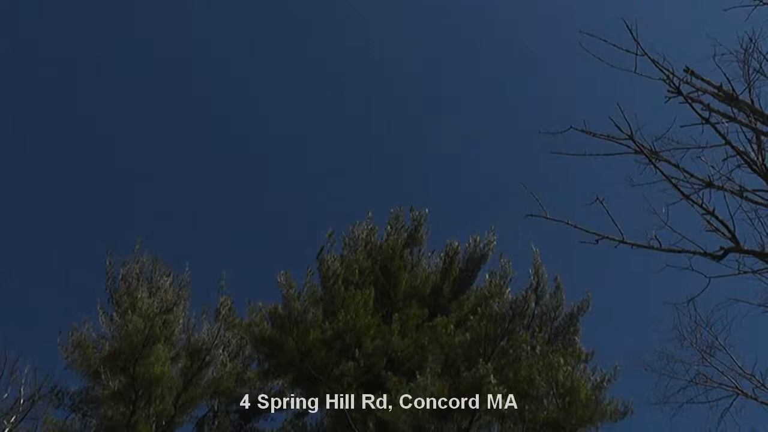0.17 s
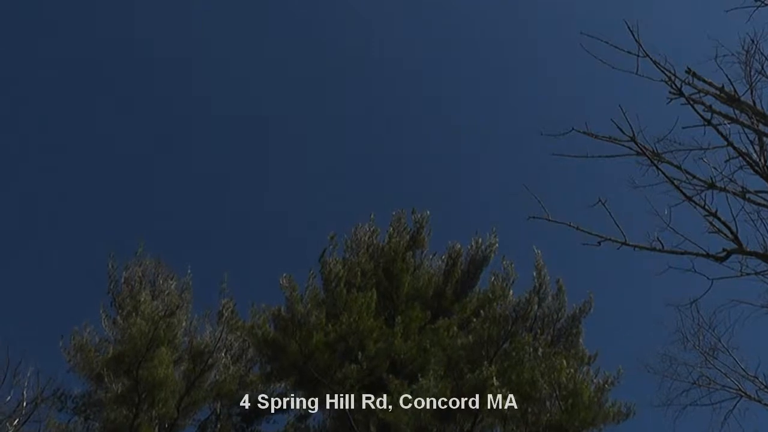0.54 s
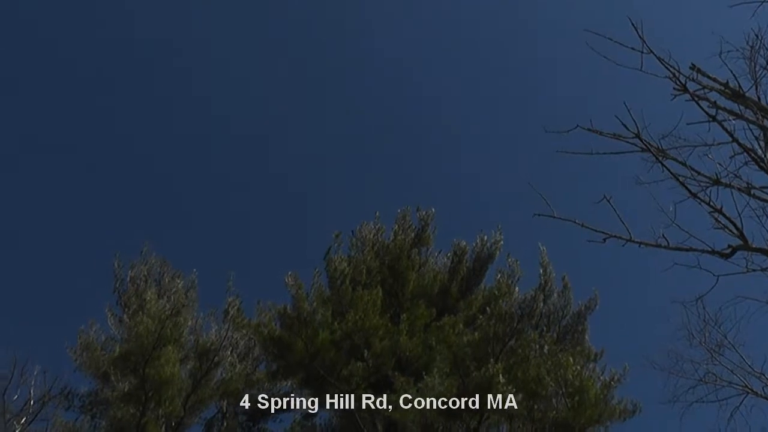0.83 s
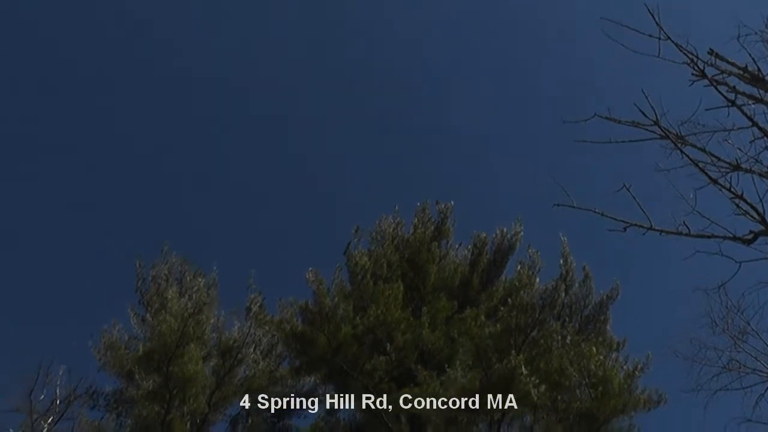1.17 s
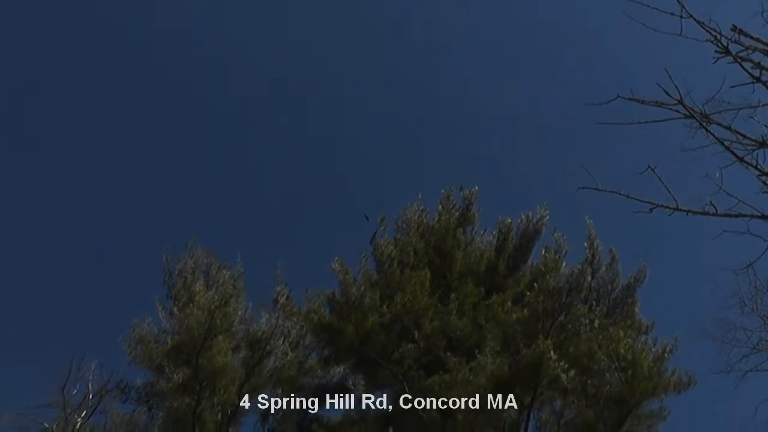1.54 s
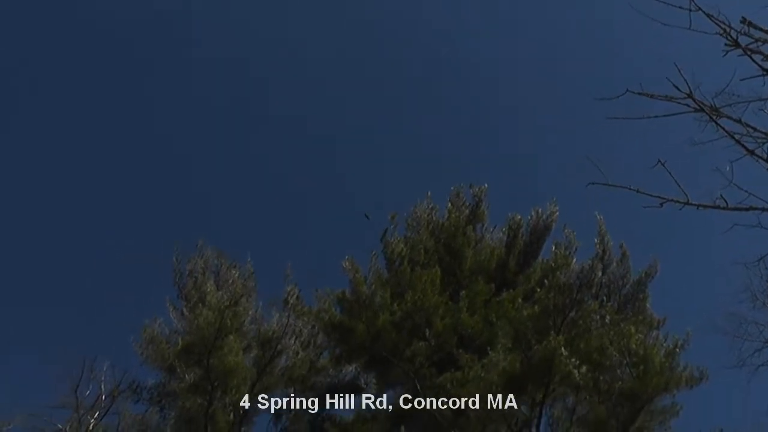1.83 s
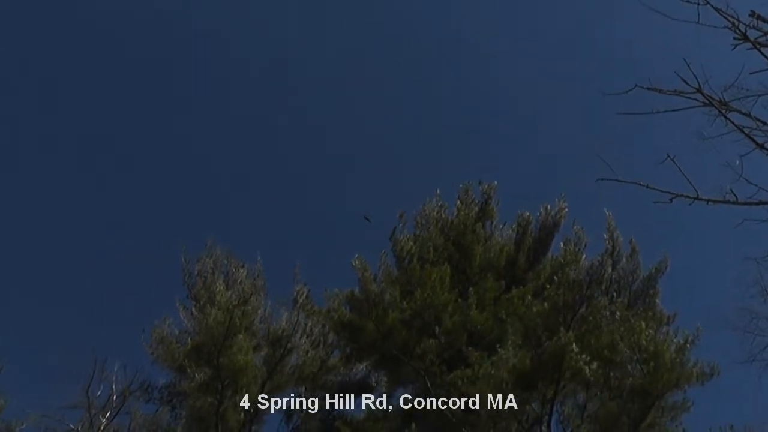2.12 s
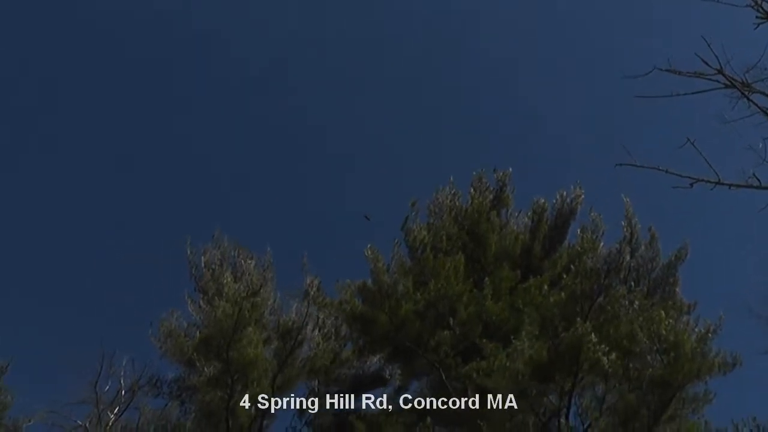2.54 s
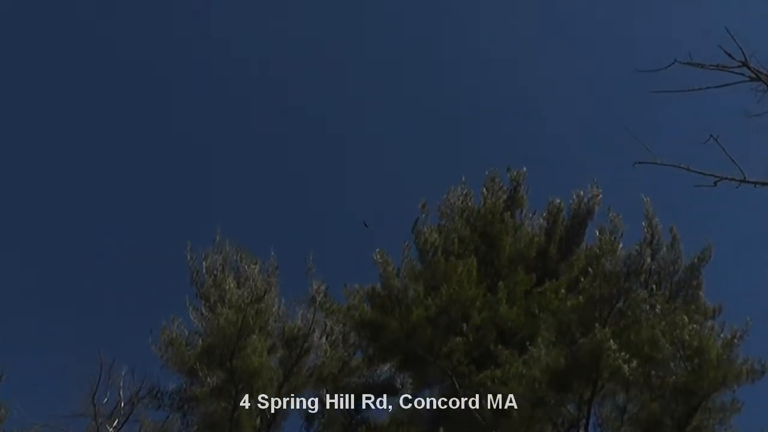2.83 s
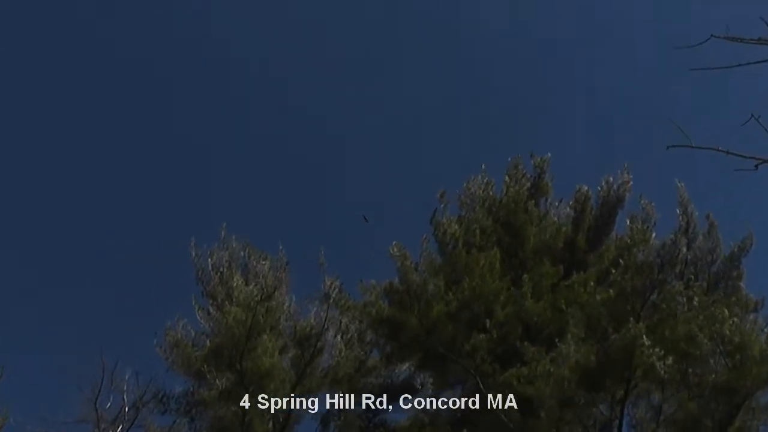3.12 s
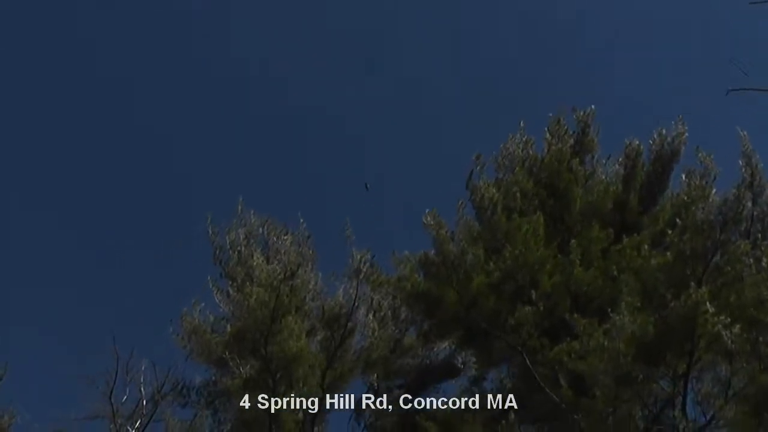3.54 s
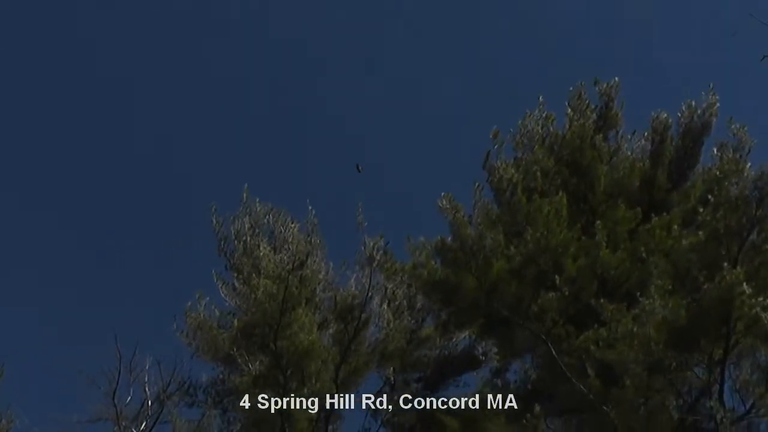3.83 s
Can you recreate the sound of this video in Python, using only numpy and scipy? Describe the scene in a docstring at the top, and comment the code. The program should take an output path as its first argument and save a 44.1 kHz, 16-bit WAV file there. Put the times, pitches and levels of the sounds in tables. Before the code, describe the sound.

A hawk screams twice from far off, each a sagging reedy whistle cracking into a hoarse ending; small birds chirp throughout over soft distant traffic rumble, outdoors among echoing trees, hawk distant from the microphone.

```python
"""A hawk screams twice: each scream is a sagging, reedy whistle that cracks down into a short hoarse ending.
Its voice is a sum of harmonics with jittered pitch, coloured by a throat, plus breath noise.
Small birds chirp nearer by as gliding tones with overtones; a thin song buzzes very high; rustles are noise.
Decaying noise tails make the woods echo the birds. Distant traffic is coloured noise with an engine's drone."""
import sys
import numpy as np
from scipy import signal
from scipy.fft import rfft, irfft
from scipy.io import wavfile

SR = 44100
rng = np.random.default_rng(int(sys.argv[2]) if len(sys.argv) > 2 else 0)


def generate_wav(signal):
    """Clip the signal to [-1, 1] and save it as 16-bit WAV at the path in sys.argv[1]."""
    frames = np.transpose(np.atleast_2d(signal))
    scaled = np.clip(frames, -1, 1) * 32767
    pcm = np.round(scaled).astype(np.int16)
    wavfile.write(sys.argv[1], SR, pcm)


N = 175959
T = np.arange(N) / SR  # time (s)
TOP_HZ = 15650  # upper band edge


def undb(db):
    """Logarithmic level: decibels to amplitude gain."""
    return 10 ** (np.asarray(db) / 20)


def colour(points, hz):
    """Frequency response: gain of a (pitch_hz, level_db) curve, interpolated over log frequency."""
    f, db = np.array(points, float).T
    return undb(np.interp(np.log(np.maximum(hz, 1)), np.log(f), db))


def tint(x, points):
    """Linear filtering: the spectrum is multiplied by a frequency response."""
    return irfft(rfft(x) * colour(points, np.fft.rfftfreq(N, 1 / SR)), N)


def noise(points):
    """Coloured noise: filtered white noise, scaled to unit rms."""
    x = tint(rng.standard_normal(N), points)
    return x / x.std()


def walk(rate_hz):
    """Random modulation: low-passed noise of unit spread that changes about rate_hz times a second."""
    lowpass = 1 + (np.fft.rfftfreq(N, 1 / SR) / rate_hz) ** 4
    x = irfft(rfft(rng.standard_normal(N)) / lowpass, N)
    return (x - x.mean()) / x.std()


def gate(start, end, rise, fall):
    """Amplitude envelope: open from start to end, with linear ramps just outside (s)."""
    return np.clip((T - start) / rise + 1, 0, 1) * np.clip((end - T) / fall + 1, 0, 1)


def turn(hz):
    """Frequency modulation: phase is the running integral of a moving pitch."""
    return 2 * np.pi * np.cumsum(hz) / SR


def woods(x, t60, treble_t60, onset, echo_db):
    """Diffuse scattering: many trunks return a decaying noise tail, with its own decay for the treble."""
    t = T[:SR]
    mid, side = rng.standard_normal((2, SR))
    scatter = mid + 0.44 * side * np.array([[1], [-1]])
    low = signal.sosfilt(signal.butter(2, 4500, fs=SR, output="sos"), scatter)
    high = signal.sosfilt(signal.butter(2, 4500, "high", fs=SR, output="sos"), scatter)
    # each band falls 60 dB in its own reverberation time
    low_tail = low * np.exp(-np.log(1000) * t / t60)
    high_tail = high * np.exp(-np.log(1000) * t / treble_t60)
    tail = (low_tail + high_tail) * (1 - np.exp(-t / onset))
    tail /= np.sqrt(np.sum(tail ** 2) / 2)
    return x + undb(echo_db) * signal.fftconvolve(x[None], tail, axes=1)[:, :N]


# relative spectrum of distant traffic and air in the trees: pitch_hz [Hz], level_db [dB]
TRAFFIC = [(25, -39.5), (60, -20), (96, -8.5), (130, -6), (235, -0.5), (320, -6), (500, -12), (800, -18),
           (2200, -27.5), (3600, -36.5), (8000, -56.5), (11000, -56.5), (15500, -63)]
# stereo width of that noise: pitch_hz [Hz], side minus mid level_db [dB]
WIDTH = [(30, 19), (70, -13), (160, -13.5), (600, -8.5), (2000, -8.5), (5000, -20), (12000, -7.5)]
# relative level of the deep rumble: start_s [s], level_db [dB]
RUMBLE = [(.2, 0), (2.2, -1.3), (2.85, 2), (3.3, -0.9), (3.8, 0.5)]
# peak level of a far engine's drone, before its random swell: start_s [s], level_db [dB]
DRONE = [(.14, -39.5), (.5, -34), (.7, -39), (.95, -58), (3.9, -85)]
DRONE_HZ, RUMBLE_HZ = 131.9, 310  # mean pitch; upper edge of the rumble
TRAFFIC_DB, SWELL_DB, FLICKER_DB = -34, -0.05, 0.56  # level; slow and fast random spread


def traffic():
    """Broadband source: wide mid-side noise with a varying low band, and the tone of one engine."""
    air = np.array([noise(TRAFFIC), tint(noise(TRAFFIC), WIDTH)])
    deep = signal.sosfiltfilt(signal.butter(2, RUMBLE_HZ, fs=SR, output="sos"), air)
    air = air - deep + deep * undb(np.interp(T, *np.array(RUMBLE).T))
    mid, side = air * undb(TRAFFIC_DB + SWELL_DB * walk(1) + FLICKER_DB * walk(21.4))
    drone_level = undb(np.interp(T, *np.array(DRONE).T) + 2.8 * walk(19))
    drone = drone_level * np.sin(turn(DRONE_HZ * (1 + 0.0291 * walk(5.5))))
    return mid + drone + side * np.array([[1], [-1]])


# soft rustles high in the treble: centre start_s [s], half_width_s [s], level_db [dB]
RUSTLES = [(0.712, 0.071, -60.5), (1.397, 0.047, -60), (3.104, 0.96, -68.5), (3.743, 0.024, -51)]
# their relative spectrum: pitch_hz [Hz], level_db [dB]
RUSTLE = [(2000, 0), (6000, 2.5), (11000, -4), (15000, -19)]


def rustles():
    """Amplitude-modulated noise: bell-shaped swells with a random grain give faint swishes."""
    swell = sum(undb(db) * np.exp(-((T - s) / width) ** 2) for s, width, db in RUSTLES)
    return swell * undb(1.9 * walk(200)) * noise(RUSTLE)


# a faint, very high song: start_s [s], pitch_hz [Hz], trill_depth_hz [Hz], level_db [dB]
THIN_SONG = [(1.61, 8270, 80, -70), (1.73, 8280, 129, -73), (1.77, 9100, 760, -63.5),
             (1.81, 9250, 594, -72), (1.85, 8640, 700, -81), (1.89, 8000, 705, -72),
             (1.954, 8780, 286, -65.5), (1.98, 8700, 300, -77)]
TRILL_HZ = 95  # mean trill rate


def thin_song():
    """Frequency modulation: a fast, unsteady trill turns a thin whistle into a buzz."""
    s, hz, depth, db = np.array(THIN_SONG, float).T
    trill = np.sin(turn(TRILL_HZ * (1 + 0.18 * walk(39.7)))) + 0.39 * walk(404)
    loud = gate(s[0], s[-1], 0.017, .019) * undb(np.interp(T, s, db) + 2.8 * walk(90))
    return loud * np.sin(turn(np.interp(T, s, hz) + np.interp(T, s, depth) * trill))


# note shapes of the small birds: start_s from the accent [s], pitch_hz [Hz], level_db [dB]
SWOOP = [(-.011, 3500, -5.5), (-.003, 4940, -2.5), (.002, 5400, 1), (.010, 4030, -5), (.023, 3600, -6),
         (.034, 3170, -2.5), (.046, 2800, -10), (.068, 2950, -12.5), (.087, 3750, -6), (.105, 3100, -15)]
CHIRRUP = [(-.04, 3550, -23), (-.021, 3980, -12), (-.005, 4000, -5.5), (0, 4370, -10), (.004, 3130, -17),
           (.008, 4700, -15), (.014, 3200, -17), (0.022, 3717, -12), (.036, 3190, -12.5),
           (0.047, 2900, -23)]
CHIP = [(-.018, 2800, -21), (-.014, 4110, -8), (-.012, 5550, -12), (-.002, 5823, -1), (.008, 5710, -3.5),
        (.021, 4950, -16), (0.023, 3750, -23), (.028, 3000, -14)]
# bird notes: accent start_s [s], shape, level_db [dB], overtone_db [dB], roughness [0-1],
# rasp_db [dB], echo_db [dB]
NOTES = [(0.207, SWOOP, -43, -24.5, .55, -25, 2), (0.436, CHIRRUP, -35, -40, 0.14, -35, 0),
         (1.347, CHIRRUP, -33, -45, 0, -35, 2), (2.273, CHIP, -30.5, -14.5, 0.04, -12.5, -2),
         (2.684, CHIRRUP, -53, -30, .5, -20, 7), (3.231, CHIRRUP, -34.5, -43, 0, -35, 3.5),
         (3.758, SWOOP, -42, -22, .6, -16, -2.5)]
# air in the rasp of a note: pitch_hz [Hz], relative level_db [dB]
BIRD_RASP = [(2000, 2), (3600, 3.5), (6800, -4), (8500, -26), (15000, -34)]
NOTE_JITTER = 0.0558  # share of the pitch at roughness 1
LEAP_HZ_PER_S = 150000  # glide rate at which the rasp approaches its full level
OVERTONE_SWELL_DB, OVERTONE_SWELL_S = 4.5, 0.004  # rise to either side of the accent
GROUND_LAG_S, GROUND_DB = 0.017, -11.5
BIRD_T60_S, BIRD_TREBLE_T60_S, BIRD_ONSET_S = 0.33, 0.38, 0.001


def small_birds():
    """Gliding tones: quick whistles rasp where pitch leaps, then reflect off the ground and the woods."""
    out, air = 0, noise(BIRD_RASP)
    for start, shape, db, overtone_db, rough, rasp_db, echo_db in NOTES:
        s, hz, shape_db = np.array(shape, float).T
        pitch = np.interp(T, start + s, hz)
        sounding = gate(start + s[0], start + s[-1], 0.0028, 0.0015)
        phase = turn(pitch * (1 + NOTE_JITTER * rough * walk(700)))
        loud = undb(np.interp(T, start + s, shape_db) + 6.1 * rough * walk(780))
        accent = np.clip((T - start) / OVERTONE_SWELL_S, -1, 1)
        overtone = undb(overtone_db + OVERTONE_SWELL_DB * accent)
        whistle = np.sqrt(2) * loud * (np.sin(phase) + overtone * np.sin(2 * phase))
        leap = np.tanh(abs(np.gradient(pitch)) * SR / LEAP_HZ_PER_S)
        note = undb(db) * sounding * (whistle + undb(rasp_db) * leap * air)
        note = note + undb(GROUND_DB) * np.interp(T - GROUND_LAG_S, T, note)
        out = out + woods(note, BIRD_T60_S, BIRD_TREBLE_T60_S, BIRD_ONSET_S, echo_db)
    return out


TWINKLE_DB, GRAIN_DB = 2, 1.5  # spread of each harmonic's slower and faster flicker


def stack(hz, throat, orders, envelope, treble_db=0):
    """Source and filter: throat-coloured harmonics twinkle on their way through the air, with a fast grain."""
    out, on = np.zeros(N), envelope > 0
    phase = turn(hz)[on]
    twinkle = undb(TWINKLE_DB * walk(33) + GRAIN_DB * walk(130))
    treble_db = (treble_db + np.zeros(N))[on]
    for k in orders:
        # the treble lift grows with frequency and is complete at TOP_HZ
        gain = colour(throat, k * hz[on]) * undb(treble_db * (k * hz[on] / TOP_HZ))
        out[on] += gain * np.sin(k * phase) * np.roll(twinkle, rng.integers(N))[on]
    return np.sqrt(2) * out * envelope


# throat response in the held part: pitch_hz [Hz], level_db [dB]
THROAT = [(3600, 1), (4600, -7.5), (5150, -7), (5900, -16.5), (6400, -9.5), (7200, -13.5), (8200, -19),
          (9500, -25), (11000, -40), (13800, -31), (15000, -44)]
# air through the throat: pitch_hz [Hz], relative level_db [dB]
RASP = [(1500, -8), (5000, 13), (8000, 7), (15000, -6)]
SCOOP_S, SCOOP_SHARE, SCOOP_DB, SCOOP_TREBLE_DB = .022, .3, -10, -41  # start: low, soft and dull
CRACK_S = 0.0039  # length of the quick ramps
JITTER, ONSET_JITTER, ONSET_S = 0.0022, 0.0115, 0.019  # share of pitch, held and added at the start
FLUTTER_DB, RASP_DB = 0.78, -15  # random level spread; breath relative to the reed
REED_DB, REED_FADE_DB_PER_S = -46.5, 25.5
FUNDAMENTAL_DB, FUNDAMENTAL_FADE_DB_PER_S = -45, 29
GAPE_S, GAPE_WIDTH_S = 0.29, 0.17  # time of the widest beak, and its spread


def scream(curve, gape_db, count=14):
    """Resonance: a rough scoop leads to a sagging note whose second harmonic rings; a wide beak lifts treble."""
    s, pitch, ring_db = np.array(curve, float).T
    scoop = np.clip((s[0] - T) / SCOOP_S, 0, 1)
    age = np.clip(T - s[0], 0, 1)
    jitter = JITTER + ONSET_JITTER * np.exp(-age / ONSET_S) + 0.0414 * scoop
    hz = np.interp(T, s, pitch) * (1 - SCOOP_SHARE * scoop) * (1 + jitter * walk(368))
    sounding = gate(s[0] - SCOOP_S, s[-1] + CRACK_S, CRACK_S, CRACK_S)
    effort = sounding * undb(SCOOP_DB * scoop + FLUTTER_DB * walk(70))
    ring = np.sin(2 * turn(hz)) * undb(np.interp(T, s, ring_db))
    fundamental = np.sin(turn(hz)) * undb(FUNDAMENTAL_DB - FUNDAMENTAL_FADE_DB_PER_S * age)
    reed = effort * undb(REED_DB - REED_FADE_DB_PER_S * age)
    gape = np.exp(-((age - GAPE_S) / GAPE_WIDTH_S) ** 2)
    treble_db = gape_db * gape + SCOOP_TREBLE_DB * scoop
    lowest = np.sqrt(2) * effort * (ring + fundamental)
    upper = stack(hz, THROAT, range(3, count), reed, treble_db)
    return lowest + upper + undb(RASP_DB) * reed * noise(RASP)


# throat response in the hoarse ending: pitch_hz [Hz], level_db [dB]
HOARSE_THROAT = [(800, -25), (1700, -2.5), (2100, 3), (2450, 0.5), (3100, -2.5), (4200, -36), (6000, -32)]
HOARSE_JITTER, RELEASE_S = 0.0082, 0.01  # share of pitch; length of the final fade


def ending(start, length, first_hz, last_hz, first_db, last_db, count=12):
    """Register break: the voice cracks to a lower, rougher pitch and droops as it stops."""
    span = [start, start + length]
    droop = np.clip((T - span[1]) / RELEASE_S + 1, 0, 2)
    glide = np.interp(T, span, [first_hz, last_hz])
    hz = glide * (1 - 0.083 * droop) * (1 + HOARSE_JITTER * walk(300))
    level_db = np.interp(T, span, [first_db, last_db]) + 0.68 * walk(60)
    effort = gate(*span, CRACK_S, RELEASE_S) * undb(level_db)
    return stack(hz, HOARSE_THROAT, range(1, count), effort) + undb(-25) * effort * noise(RASP)


# held part of each scream: start_s [s], pitch_hz [Hz], second harmonic level_db [dB]
SCREAM_1 = [(0.18, 1275, -44.5), (0.238, 1262, -40), (0.282, 1277, -48.5), (0.32, 1229, -33.5),
            (0.362, 1232, -35.5), (0.384, 1213, -47), (0.414, 1194, -36.5), (0.47, 1181, -38),
            (0.529, 1169, -30.5), (0.586, 1124, -42), (0.6, 1095, -38)]
SCREAM_2 = [(1.059, 1223, -45.5), (1.078, 1240, -42), (1.146, 1233, -31.5), (1.234, 1181, -30),
            (1.305, 1155, -30.5), (1.346, 1161, -35.5), (1.373, 1142, -30.5), (1.423, 1130, -33),
            (1.446, 1107, -39.5), (1.468, 1118, -35), (1.505, 1053, -38)]
# hoarse endings, before droop: length_s [s], first_hz [Hz], last_hz [Hz], first_db [dB], last_db [dB]
ENDINGS = [(0.097, 874, 790, -47.5, -47), (.115, 876, 745, -46, -54.5)]
# treble lift at TOP_HZ with the widest beak, one value a scream: level_db [dB]
GAPE_DB = [6.5, 11.5]


def hawk():
    """Voiced registers in sequence: two screams, each running into its hoarse ending."""
    out = 0
    for curve, gape_db, end in zip([SCREAM_1, SCREAM_2], GAPE_DB, ENDINGS):
        crack = curve[-1][0] + 2 * CRACK_S
        out = out + scream(curve, gape_db) + ending(crack, *end)
    return out


WOODS_T60_S, WOODS_TREBLE_T60_S, WOODS_ONSET_S, HAWK_ECHO_DB = 0.98, 0.24, 0.02, -16
SONG_ECHO_DB = 0.5
PAN_DB = -1  # left minus right


def scene():
    """Superposition: hawk and traffic lie a little to the right; the other sources are added to them."""
    far = woods(hawk(), WOODS_T60_S, WOODS_TREBLE_T60_S, WOODS_ONSET_S, HAWK_ECHO_DB)
    song = woods(thin_song(), BIRD_T60_S, BIRD_TREBLE_T60_S, BIRD_ONSET_S, SONG_ECHO_DB)
    pan = undb(np.array([[PAN_DB], [-PAN_DB]]) / 2)
    return (far + traffic()) * pan + small_birds() + song + rustles()


START_S = 0.1336


def record(dry):
    """Band limiting: the sound opens after a moment of silence, and a steep low-pass cuts the top."""
    opened = dry * np.clip((T - START_S) / 0.011, 0, 1)
    return signal.sosfilt(signal.ellip(10, .2, 80, TOP_HZ, fs=SR, output="sos"), opened)


dry = scene()
out = record(dry)
generate_wav(out)
```